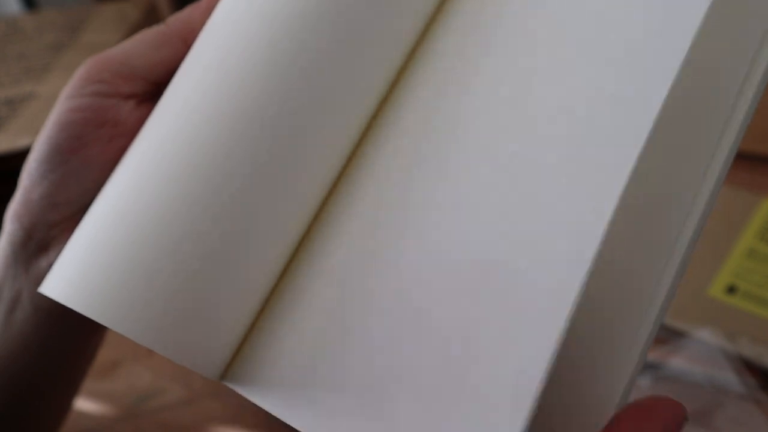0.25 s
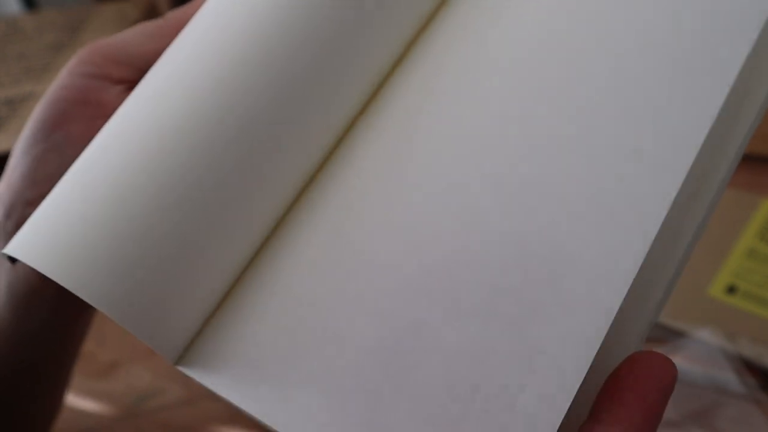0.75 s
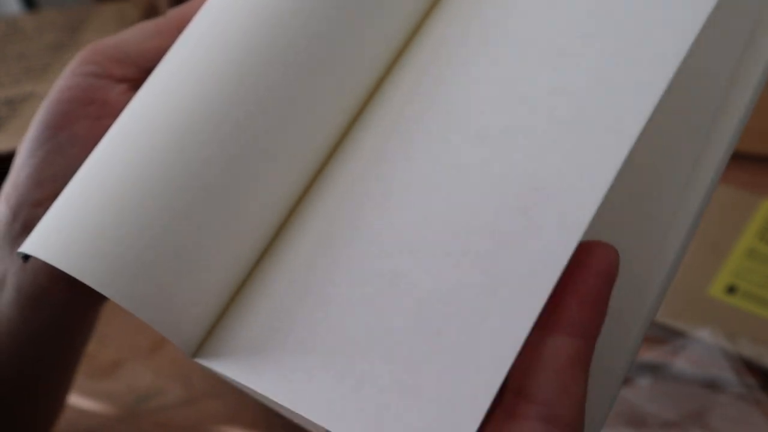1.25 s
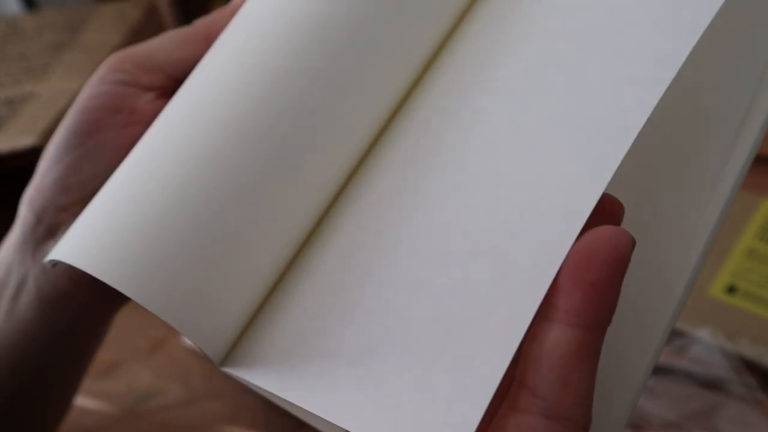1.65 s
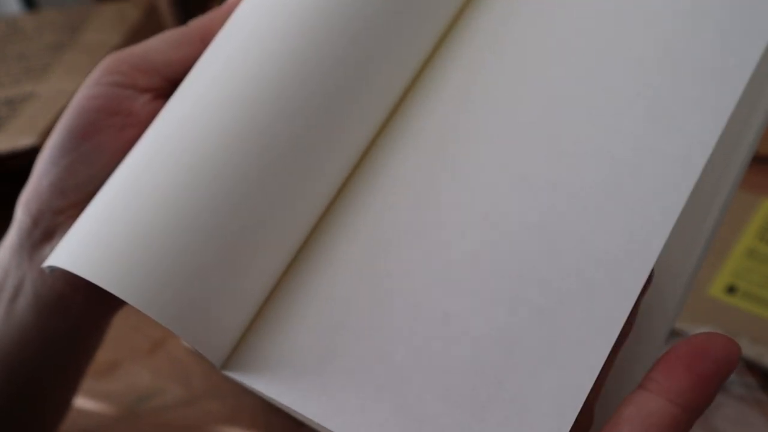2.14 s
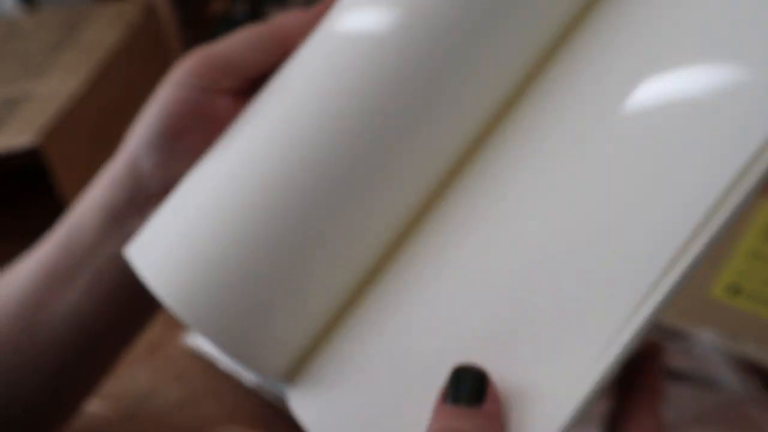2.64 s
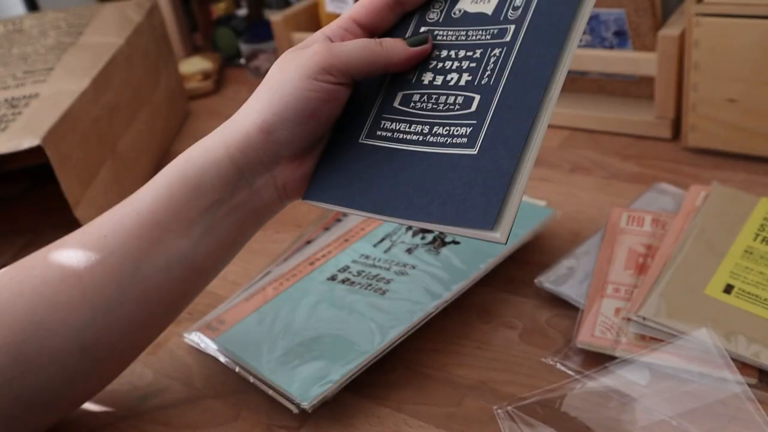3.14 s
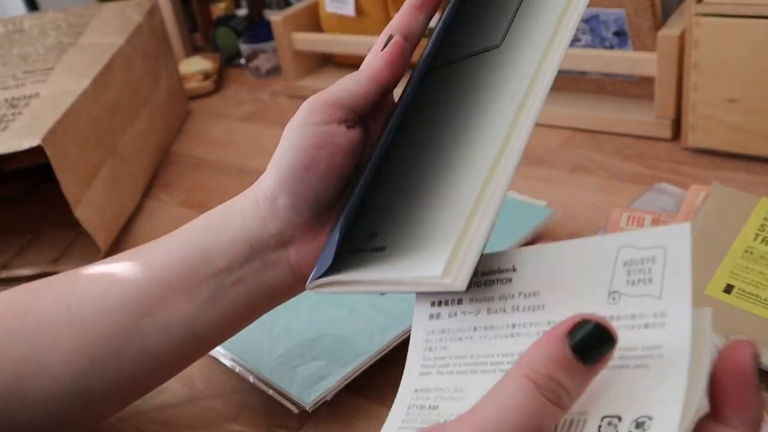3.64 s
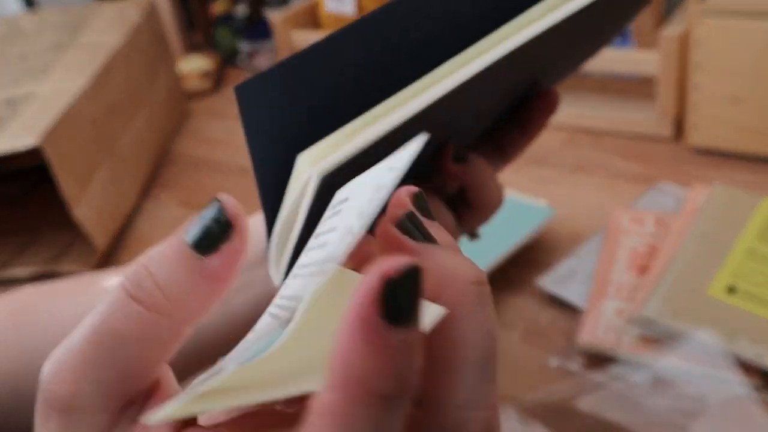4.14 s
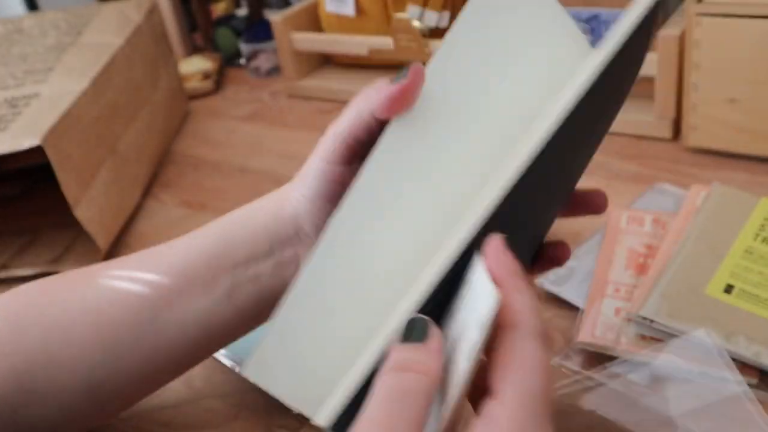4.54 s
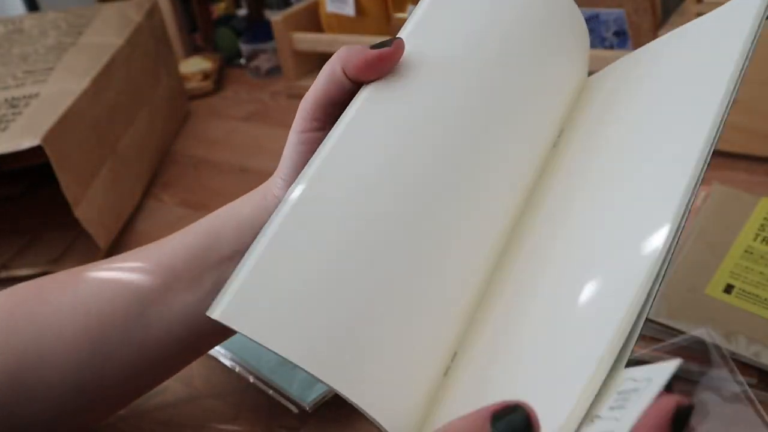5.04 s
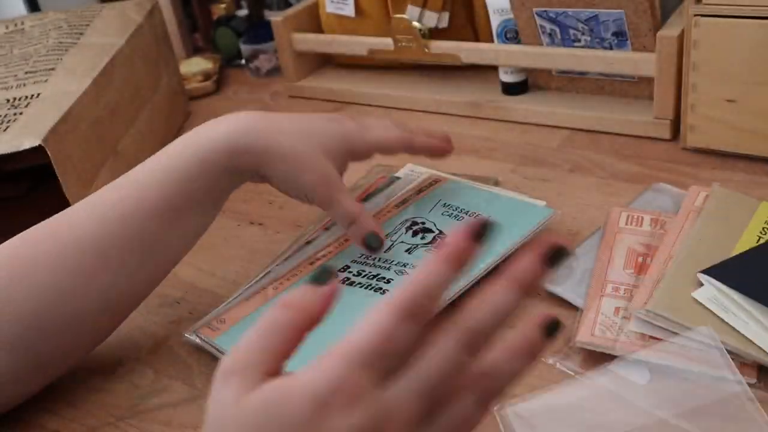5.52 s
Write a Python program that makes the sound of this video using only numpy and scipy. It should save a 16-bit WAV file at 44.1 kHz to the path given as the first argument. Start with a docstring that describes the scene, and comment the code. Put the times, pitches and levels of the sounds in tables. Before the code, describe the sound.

Very close to one microphone in a quiet room, fingers brush thin notebook pages in soft, smooth strokes with pauses over a faint low hum. Just before halfway the pages flap shut in a loud cluster of snaps and dull bumps. The room tone then changes abruptly, and a stiff card scrapes and clicks against paper, crisper and brighter, ending with a few taps as the notebook is set aside.

```python
"""Fingers slide over and under a page close to one microphone, over the faint hum of a quiet room.
The sheets flap shut, a stiff card is flexed and tucked between the pages, and the notebook is put aside.
Rubbing is friction noise shaped by a resonant sheet and by stroke speed; snaps, ticks and bumps are short
bursts of filtered noise. Two room tones are coloured noise with resonances; a two-partial mains hum fades."""
import sys
import numpy as np
from scipy import signal
from scipy.fft import rfft, irfft
from scipy.io import wavfile
from scipy.ndimage import uniform_filter1d, map_coordinates

SR = 44100
rng = np.random.default_rng(int(sys.argv[2]) if len(sys.argv) > 2 else 0)


def file_out(sig):
    """Save sig as 16-bit WAV at sys.argv[1]."""
    # one column per channel
    cols = np.atleast_2d(sig).T
    # limit, then scale
    lim = np.clip(cols, -1, 1)
    pcm = np.round(lim * 32767).astype(np.int16)
    wavfile.write(sys.argv[1], SR, pcm)


N = 254898
TIME = np.arange(N) / SR
HZ = np.maximum(np.arange(N // 2 + 1) * SR / N, 1)

# slides and scuffs of card and cover: [start t/s, length t/s, share of the length at top speed 0-1,
# mid-band level/dB, low band (sheet flex) re mid/dB, high band (brightness) re mid/dB]
CARD_STROKES = [(2.958, 0.0455, 0.48, -49.5, -7.5, -0.5), (2.981, 0.142, 0, -51, 5, -18),
                (3.1, 0.194, 0.13, -53.5, 4.5, -13.5), (3.124, 0.0268, 0.57, -51, -6.5, 1.5),
                (3.244, 0.139, 0.16, -55.5, 9, -4.5), (3.325, 0.092, 0.62, -56, 5.5, -6.5),
                (3.406, 0.097, 0.21, -54.5, 8, -7), (3.383, 0.0331, 0.7, -40.5, -2, -4),
                (3.489, 0.0172, 0.47, -48.5, 5, -9.5), (3.577, 0.0966, 0.43, -46.5, -2, -3.5),
                (3.662, 0.104, 0.19, -59, 1.5, 2), (3.759, 0.0533, 0.92, -61.5, 16, 6.5),
                (3.878, 0.0247, 0.52, -57.5, 16, 1.5), (3.932, 0.0373, 0.44, -67, 16.5, 3.5),
                (4.004, 0.135, 0.48, -66.5, -1, 7), (4.193, 0.0535, 0.32, -59, 4.5, -1.5),
                (4.254, 0.0966, 0.57, -50, 8.5, 2), (4.343, 0.081, 0.26, -49.5, 2, 1.5),
                (4.414, 0.094, 0.48, -50.5, 5, 4), (4.501, 0.126, 0.44, -50.5, -2, -5.5),
                (4.584, 0.071, 0.5, -50, 2.5, 3), (4.692, 0.0525, 0.79, -55, -11.5, 6),
                (4.744, 0.14, 0.17, -59.5, 5, -1.5), (4.805, 0.048, 0.75, -46.5, 8.5, 1),
                (4.925, 0.133, 0.08, -62.5, 13, 7), (5.016, 0.0832, 0.37, -50, 0.5, 5),
                (5.077, 0.1594, 0.49, -43.5, -8.5, -2), (5.126, 0.0475, 0.54, -50, -8, 8.5),
                (5.247, 0.0297, 0.47, -53, 1.5, -0.5), (5.289, 0.17, 0.29, -55, 5, -3.5),
                (5.474, 0.123, 0.15, -50.5, 7, -3), (5.543, 0.0157, 0.73, -48, -5.5, -1.5)]


def from_db(db):
    """Level definition: an amplitude ratio is 10 to the power dB/20."""
    return 10 ** (np.asarray(db) / 20)


def rms_one(x):
    """Normalisation: a signal divided by its rms has unit power."""
    return x / np.sqrt(np.mean(x ** 2) + 1e-20)


def in_time(rows):
    """Linear interpolation: each column of a curve is read sample by sample."""
    s, *columns = np.transpose(rows)
    return [np.interp(TIME, s, c) for c in columns]


def at_hz(points, hz):
    """Logarithmic frequency axis: a spectrum in dB is interpolated along log f."""
    points = np.array(points)
    return np.interp(np.log(hz), np.log(points[:, 0]), points[:, 1])


def drift(rate, size=16384):
    """Low-passed noise: a smooth random wander of spread 1, its spectrum halved at rate (Hz)."""
    hz = np.arange(size // 2 + 1) * SR / N
    slow = irfft(rfft(rng.standard_normal(size)) / (1 + (hz / rate) ** 2))
    # the short series is stretched over the whole scene
    return np.interp(np.linspace(0, size - 1, N), np.arange(size), rms_one(slow))


def coloured(x, gain_db):
    """Minimum phase: folding the cepstrum gives a causal filter with the stated gain at each FFT bin."""
    size = len(x)
    cepstrum = irfft(np.log(from_db(gain_db)), size)
    cepstrum[1:size // 2] *= 2
    cepstrum[size // 2 + 1:] = 0
    return irfft(rfft(x) * np.exp(rfft(cepstrum)), size)


def friction(slips_per_s, size_db, hiss, judder_db, judder_hz):
    """Stick-slip: fibres catch and let go in tiny slips of uneven size, bunched by the judder."""
    unevenness = np.minimum(rng.exponential(1, N), 4)
    sizes = from_db(size_db * unevenness) * rng.choice([-1, 1], N)
    slips = rms_one(sizes * (rng.random(N) < slips_per_s / SR))
    grain = slips + hiss * rng.standard_normal(N)
    grain = grain * from_db(judder_db * drift(judder_hz))
    # the grain is levelled by its running power over 900 samples
    return grain / np.sqrt(uniform_filter1d(grain ** 2, size=900) + 1e-9)


def facing_sheet(x, gap_s, reflection, bend):
    """Comb filtering: the opposite sheet returns the sound after a delay that wanders as paper bends."""
    delay = gap_s * SR * np.exp(bend * drift(2.473))
    return x + reflection * map_coordinates(x, [np.arange(N) - delay], order=3)


def moving_band(x, hz, width, size=256):
    """Resonance: a two-pole band-pass, peak gain about 1, width as a share of its moving centre."""
    out, state = np.zeros(N), np.zeros(2)
    for i in range(0, N, size):
        w = 2 * np.pi * hz[i] / SR
        r = np.exp(-w * width / 2)
        gain = (1 - r * r) / 2
        poles = [1, -2 * r * np.cos(w), r * r]
        out[i:i + size], state = signal.lfilter([gain, 0, -gain], poles, x[i:i + size], zi=state)
    return out


def held_sheet(x, grip, width, overtone, overtone_share):
    """Plate resonance: the sheet between the fingers rings as the grip sets it, with one overtone."""
    hz, boost_db = in_time(grip)
    ring = moving_band(x, hz, width) + overtone_share * moving_band(x, hz * overtone, width)
    return x + (from_db(boost_db) - 1) * ring


def stroke_speed(start, length, fastest_at):
    """Kinematics: the hand leaves rest and returns to it, a quarter sine each way, top speed 1."""
    turn = np.clip(fastest_at, .02, .98)
    return np.sin(np.pi * np.interp(TIME, [start, start + turn * length, start + length], [0, .5, 0]))


def sliding(grain, colour, strokes, hold, speed_law, flex_hz, bright_hz):
    """Friction-driven radiation: a slack sheet radiates low, a fast taut edge radiates high."""
    treble_extra = 0.13   # the treble rises a little faster with speed (added exponent)
    uneven_db, uneven_hz = 0.11, 35   # chance variation of the level: spread, corner
    sheet = rfft(rms_one(coloured(grain, at_hz([(100, -39)] + list(colour), HZ))))

    # rows of power: low, mid and high band
    held_from, held_to, db, flex_db, bright_db = hold
    held = (TIME >= held_from) & (TIME < held_to)
    power = np.outer(from_db([db + flex_db, db, db + bright_db]) ** 2, held)
    for start, length, fastest_at, db, flex_db, bright_db in strokes:
        speed = stroke_speed(start, length, fastest_at)
        moving = speed > 0
        swell = speed[moving] ** np.array([[speed_law], [speed_law], [speed_law + treble_extra]])
        power[:, moving] += (from_db([[db + flex_db], [db], [db + bright_db]]) * swell) ** 2
    power = power * from_db(uneven_db * drift(uneven_hz)) ** 2

    low = at_hz([(flex_hz / 1.224, 1), (flex_hz * 1.378, 0)], HZ)
    high = at_hz([(bright_hz / 2.92, 0), (bright_hz * 1.242, 1)], HZ)
    bands = (low, 1 - low - high, high)
    return sum(np.sqrt(p) * irfft(sheet * share, N) for p, share in zip(power, bands))


def page():
    """Dense stick-slip: soft skin on fine paper slips very often and evenly."""
    # colour of the thin page: [f/Hz, spectral density/dB per Hz]
    page_colour = [(500, -20.5), (800, -17.5), (1200, -10), (1600, -4.5), (2050, 0.5), (2700, -4.5),
                   (3500, -3), (4600, -5.5), (6800, -5.5), (7900, -6), (9400, -7.5), (10700, -15.5),
                   (13500, -8), (15800, -24)]
    # strokes of the fingers and flaps of the page: columns as in CARD_STROKES
    page_strokes = [(0, 0.02555, 0.07, -47.5, 12.5, -2), (0.019, 0.0394, 0.66, -52.5, -1.5, -6),
                    (0.084, 0.0566, 0.46, -52.5, 7, -6.5), (0.123, 0.083, 0.53, -53.5, 2.5, -9),
                    (0.1769, 0.065, 0.09, -42.5, -5.5, 0.5), (0.189, 0.182, 0.01, -43, -4.5, -3.5),
                    (0.235, 0.0653, 0.63, -47.5, 18, -1), (0.255, 0.0306, 0.51, -38.5, 15, -14.5),
                    (0.284, 0.113, 0.57, -46.5, -7, -2), (0.327, 0.4, 0.34, -52.5, 6, -5),
                    (0.608, 0.167, 0.97, -52, 4, -7), (0.722, 0.1116, 0.23, -41, 4.5, -11),
                    (0.829, 0.0835, 0.56, -56, 5, -8.5), (1.1, 0.1, 0.19, -63, 4, -6.5),
                    (1.167, 0.0634, 0.28, -56.5, 8.5, -13), (1.27, 0.0776, 0.51, -62, 12, -8.5),
                    (1.356, 0.11, .55, -62.5, 4, -4.5), (1.446, 0.0512, 0.47, -57.5, 9.5, -9),
                    (1.525, 0.1219, .27, -46.5, 5.5, -14), (1.674, 0.0906, 0.66, -54, 8, -7.5),
                    (1.794, 0.0732, 0.37, -52, 6.5, -9.5), (1.894, 0.244, 0.32, -60, -1.5, -11.5),
                    (2.102, 0.1064, 0.33, -59, 3, -8.5), (2.319, 0.318, 0.59, -49.5, -0.5, -7.5),
                    (2.425, 0.1785, 0.97, -48.5, -6, 6), (2.596, 0.146, 0.73, -52.5, 5.5, -4),
                    (2.608, 0.061, 0.41, -53.5, -11.5, 8), (2.721, 0.0625, 0.31, -37.5, 10.5, -1),
                    (2.759, 0.0624, 0.81, -35.5, 7.5, -12), (2.833, .03, 0.44, -36.5, 10.5, -20.5),
                    (2.807, 0.0818, 0.56, -52, -3.5, 0.5), (2.871, 0.0566, 0.34, -47, 17, -13.5),
                    (2.879, 0.0175, 0.57, -37, 15, -4.5), (2.917, 0.0246, 0.46, -51.5, -7, 4),
                    (2.94, 0.0213, 0.07, -38.5, 3.5, -5.5)]
    # faint steady rubbing under the last strokes and flaps of the page: [from t/s, to t/s,
    # mid-band level/dB, low band re mid/dB, high band re mid/dB]
    page_hold = (2.53, 3, -64, 17, 4)
    # resonance of the free part of the page, set by the grip: [t/s, f/Hz, boost/dB]
    page_grip = [(0, 1700, -1), (.3, 1980, -1), (.52, 2450, 6.5), (.77, 1890, 1.5), (1.57, 2120, 2.5),
                 (1.8, 1730, 4.5), (2.15, 2210, 5), (2.5, 1650, 4.5), (2.92, 1630, 1)]
    grain = friction(slips_per_s=11000, size_db=3.5, hiss=0.895, judder_db=1.6046, judder_hz=120)
    grain = facing_sheet(grain, gap_s=.0019, reflection=0.236, bend=0.3224)
    grain = held_sheet(grain, page_grip, width=0.37, overtone=1.56, overtone_share=0.06)
    return sliding(grain, page_colour, page_strokes, page_hold, speed_law=1.014, flex_hz=1503, bright_hz=8050)


def room_tone():
    """Coloured noise: a murmur that changes from one tone to another, with mains hum that fades away."""
    # two room tones, first and second: [f/Hz, spectral density/dB per Hz]
    first_tone = [(26, -13), (62, -10), (120, -5.5), (185, -10.5), (270, -7), (390, -10), (520, -17),
                  (800, -12.5), (1120, -20), (2100, -21), (4600, -27), (15500, -32.5)]
    second_tone = [(26, -37.5), (86, -14), (145, -6.5), (265, -3.5), (450, -3), (760, -7.5), (1130, -8),
                   (2350, -13.5), (3700, -14), (4700, -14.5), (15500, -21)]
    # resonances in each room tone: [f/Hz, width f/Hz, boost/dB]
    first_peaks = [(342.84, 8.65, 10.5), (277, 20, 1.5), (888, 25.3, 7)]
    second_peaks = [(189.6, 35.6, 5.6), (393, 9.7, 7.4), (939.1, 25.8, 13.5)]
    # share of the second tone in the power: [t/s, share 0-1]
    second_share = [(0, 0), (2.95, 0.16), (2.99, 0.95), (5.66, 0.94), (5.68, 0.16), (5.78, 0.57)]
    # mains hum: [t/s, level/dB]
    hum_level = [(0, -66), (.9, -74), (1.5, -64.5), (2.25, -68.5), (2.48, -86.5), (3, -110)]
    first_db, second_db, mains_hz = -63, -66.5, 60   # each tone's level at full share

    def murmur(tone, peaks):
        """Spectral shaping: resonance peaks are added to the broad colour of white noise."""
        boost = sum(db / (1 + (2 * (HZ - hz) / width) ** 2) for hz, width, db in peaks)
        return rms_one(coloured(rng.standard_normal(N), at_hz(tone, HZ) + boost))

    share = np.clip(in_time(second_share)[0], 0, 1)
    first = from_db(first_db) * np.sqrt(1 - share) * murmur(first_tone, first_peaks)
    second = from_db(second_db) * np.sqrt(share) * murmur(second_tone, second_peaks)
    phase = 2 * np.pi * mains_hz * TIME
    hum = from_db(in_time(hum_level)[0]) * rms_one(np.sin(phase) + 0.135 * np.sin(2 * phase))
    return first + second + hum


def snaps(rows, ring_db, ring_width, rattle_db, rattle_s, crack, size=4096):
    """Buckling: a fold crackles up to a crack and flutters out, ringing at the pitch of the bent patch."""
    out, peak = np.zeros(N + size), size // 8
    t = (np.arange(size) - peak) / SR
    before, after = np.minimum(t, 0), np.maximum(t, 0)
    hz = np.maximum(np.arange(size // 2 + 1) * SR / size, 1)
    flutters = rng.standard_normal((len(rows), size))
    for (s, db, build_up, decay, bass, treble, ring_hz), flutter in zip(rows, flutters):
        dying = np.exp(-after / decay) + from_db(rattle_db) * np.exp(-after / rattle_s)
        force = flutter * np.exp(before / build_up) * dying
        force[peak] += crack
        colour = at_hz([(90, bass - 22), (450, bass - 3), (1000, bass), (2300, -1.97), (5500, -1.78),
                        (11000, treble), (16000, treble - 2), (18000, treble - 25)], hz)
        ring = ring_db / (1 + (np.log(hz / ring_hz) / ring_width) ** 2)
        snap = coloured(force, colour + ring)
        at = int(s * SR) - peak
        # the level is the snap's energy spread over five milliseconds
        out[at:at + size] += from_db(db) * snap * np.sqrt(.005 * SR / np.sum(snap ** 2))
    return out[:N]


def bumps():
    """Heavy damping: dull thuds swell and sink, and the slower the rise, the lower the band."""
    # soft bumps of the hands and air pushed by the sheets: [t/s, time to the peak t/s, level/dB]
    bump_rows = [(.195, 0.0115, -52), (.236, 0.00366, -50), (2.59, 0.0128, -60), (2.74, 0.0044, -49),
                 (2.754, 0.0133, -46.5), (2.776, 0.00277, -41.5), (2.783, 0.01165, -44),
                 (2.808, 0.00284, -50.5), (2.885, 0.00366, -50.5), (2.9408, 0.00408, -43.5),
                 (3.391, 0.00515, -61.5), (3.65, .006, -62.5), (3.887, 0.0037, -60.5), (4.267, 0.0048, -62),
                 (4.484, 0.00414, -55.5), (4.629, 0.00567, -61.5), (4.839, 0.00404, -62.5),
                 (5.345, 0.00324, -51.5), (5.674, 0.0158, -60.5)]
    bump_cycles = 1.687   # cycles of the top frequency in one rise
    out = np.zeros(N)
    for s, rise, db in bump_rows:
        at, top_hz = int(s * SR), bump_cycles / rise
        age = TIME[:min(int(8 * rise * SR), N - at)] / rise
        swell = age * np.exp(1 - age)
        band = signal.butter(2, [top_hz / 5, top_hz], "band", fs=SR, output="sos")
        thud = signal.sosfilt(band, rng.standard_normal(len(age)) * swell)
        out[at:at + len(age)] += from_db(db) * rms_one(thud) * np.sqrt(np.mean(swell ** 2))
    return out


def card():
    """Sparse stick-slip: a stiff edge across the pages gives coarser, crackling slips."""
    # colour of the stiff card: [f/Hz, spectral density/dB per Hz]
    card_colour = [(500, -9), (800, -8.5), (1200, -5.5), (1700, -10), (2300, 0), (2800, -3), (3500, -0.5),
                   (4500, -2.5), (6300, 2.5), (7800, 2.5), (9200, 4.5), (11000, 4.5), (13200, 6),
                   (15500, 0)]
    # faint steady rubbing under the strokes of the card: [from t/s, to t/s, mid-band level/dB,
    # low band re mid/dB, high band re mid/dB]
    card_hold = (3.5, 5.5, -69.5, 4, 3.5)
    # resonance of the free part of the card, set by the grip: [t/s, f/Hz, boost/dB]
    card_grip = [(3.0, 2850, 1.5), (3.4, 2946, 8.5), (3.65, 2530, 7.5), (4.22, 3270, 7.5), (4.46, 3510, 12),
                 (4.63, 3300, 4), (4.84, 2370, 6), (5.05, 2280, 5), (5.37, 3550, 7)]
    grain = friction(slips_per_s=2800, size_db=3.5, hiss=1.0, judder_db=3.08, judder_hz=109)
    grain = facing_sheet(grain, gap_s=0.001426, reflection=0.547, bend=0.2085)
    grain = held_sheet(grain, card_grip, width=0.233, overtone=1.64, overtone_share=0.165)
    return sliding(grain, card_colour, CARD_STROKES, card_hold, speed_law=0.847, flex_hz=1610, bright_hz=7680)


def faint_ticks():
    """Impulsive release: the card's edge catches once in each stroke, a small snap scaled to its level."""
    level_db, spread_db = -4, 3   # relative to the stroke
    bass_db, treble_db = -5, -3
    build_up_s, decay_s = .0004, .0012
    low_hz, high_hz = 3360, 12700   # range of the ring
    chance = rng.beta(2, 2, (len(CARD_STROKES), 3))
    ticks = []
    for (start, length, _, db, _, _), (when, strength, pitch) in zip(CARD_STROKES, chance):
        tick_db = db + level_db + spread_db * (2 * strength - 1)
        ring_hz = low_hz * (high_hz / low_hz) ** pitch
        ticks.append((start + when * length, tick_db, build_up_s, decay_s, bass_db, treble_db, ring_hz))
    return ticks


def room(x, t60, wet_db, dull_hz):
    """Reverberation: table and walls add a faint, short, exponentially decaying tail."""
    t = TIME[:SR // 2]
    tail = rng.standard_normal(len(t)) * from_db(-60 * t / t60) * (t > .004)
    tail = signal.sosfilt(signal.butter(1, min(dull_hz, .45 * SR), fs=SR, output="sos"), tail)
    return x + from_db(wet_db) * signal.fftconvolve(x, tail / np.sqrt(np.sum(tail ** 2)))[:N]


def scene():
    """Superposition: all paper sounds share the room, and both channels are the same."""
    # paper buckles, edges flick, nails tap: [peak t/s, level/dB, build-up t/s, decay t/s,
    # bass/dB, treble/dB, ring f/Hz]
    snap_rows = [(0.0304, -43, 0.000117, 0.00217, -2.5, -42, 2088),
                 (1.9115, -52, 0.000069, 0.00037, -5, -18.5, 1850),
                 (2.6771, -46.5, 0.000096, 0.0025, 9.5, -16, 1744),
                 (2.7425, -34.5, 0.0024, 0.0018, -14.5, -14.5, 7120),
                 (2.7783, -29.5, 0.00174, 0.001, 1.5, -29.5, 3096),
                 (2.8203, -45.5, 0.000091, 0.00086, 9.5, -11, 761),
                 (2.9421, -35, 0.000145, 0.00166, 10.5, -13, 5680),
                 (2.9694, -47.5, 0.00068, 0.00053, -17.5, -12.5, 3590),
                 (3.1054, -45.5, 0.000094, 0.0037, -15.5, -1.5, 5620),
                 (3.1117, -50, 0.000098, 0.00296, 1.5, -2.5, 4300),
                 (3.1316, -55, .0002, 0.0037, -6.5, -7.5, 11700),
                 (3.1725, -50.5, .0001, 0.0047, -6.5, -4.5, 4820),
                 (3.1614, -52, 0.00009, 0.00125, -35, -8.5, 10600),
                 (3.178, -40, 0.000112, 0.00059, -33, -8, 14360),
                 (3.2001, -47, .0008, 0.00095, -1.5, -2.5, 8900),
                 (3.2147, -39.5, 0.00076, 0.0023, -10, 0, 6080),
                 (3.478, -48, 0.000106, 0.00101, -3, -6, 12260),
                 (3.5842, -30, 0.000106, 0.00049, -11.5, 1.5, 11460),
                 (3.606, -35.5, .0007, 0.0014, -6, -0.5, 14000),
                 (3.6121, -43, .0001, 0.00195, -4.5, 8, 9700),
                 (3.653, -41.5, 0.00135, 0.0031, -1, -3, 7500),
                 (4.0017, -43, 0.00073, 0.004, -30.5, 4.5, 13300),
                 (4.269, -46, 0.00073, 0.00134, 4, -3.5, 8530),
                 (4.3661, -45.5, 0.00009, 0.00067, 8.5, -0.5, 14000),
                 (4.3832, -37.5, 0.00052, 0.0008, -6, 5, 8720),
                 (4.434, -33, 0.00064, 0.00049, -14.5, 2.5, 14050),
                 (4.4453, -43.5, 0.00093, .0035, -11, -1.5, 6300),
                 (4.4646, -27, 0.00197, 0.00125, -33.5, 4, 6470),
                 (4.4775, -41, 0.00028, 0.00165, -7, -2.5, 9250),
                 (4.482, -41.5, 0.00036, 0.00134, 2, -9.5, 2010),
                 (4.6333, -46.5, 0.00127, 0.00114, 0, -17, 3410),
                 (4.6806, -54.5, .0001, 0.00127, 0, -0.5, 3360),
                 (4.7783, -46, 0.00012, 0.0012, 0.5, -33, 3440),
                 (4.8184, -37.5, 0.00089, 0.00153, -17.5, -13.5, 8330),
                 (4.8394, -43.5, .0008, 0.0015, -1.5, -2, 2320), (5.0911, -44, .0008, 0.0052, 2, 7, 11200),
                 (5.1258, -41.5, 0.0015, 0.0024, 8.5, 6, 13600),
                 (5.347, -45.5, 0.00009, 0.00147, 4, -8, 3420),
                 (5.3649, -41, 0.0027, 0.00077, -13.5, -30.5, 3420),
                 (5.4789, -37.5, 0.000126, 0.00118, -15, -7, 2860),
                 (5.4927, -41.5, 0.00032, 0.001, -8.5, -7, 6160),
                 (5.5728, -43, 0.000095, 0.00072, 10.5, -18, 2057),
                 (5.5872, -33.5, 0.000086, 0.00263, 0.5, -14, 3320),
                 (5.679, -58, 0.00123, 0.0033, -2.5, -10.5, 1500)]
    rubbing, tone = page() + card(), room_tone()
    ticks = snaps([*faint_ticks(), *snap_rows], ring_db=12.5, ring_width=0.1176,
                  rattle_db=-22, rattle_s=0.00984, crack=2.04)
    paper = room(rubbing + ticks + bumps(), t60=0.156, wet_db=-20, dull_hz=6500)
    return np.tile(paper + tone, (2, 1))


def record(dry):
    """Gating and band limiting: the sound drops out once, briefly, and the top is cut steeply."""
    gap_from_s, gap_to_s, cutoff_hz = 5.649, 5.659, 16000
    # the running mean softens the edges of the gap
    alive = uniform_filter1d(1.0 * ((TIME < gap_from_s) | (TIME > gap_to_s)), size=64)
    return signal.sosfilt(signal.butter(24, cutoff_hz, fs=SR, output="sos"), dry * alive)


dry = scene()
out = record(dry)
file_out(out)
```